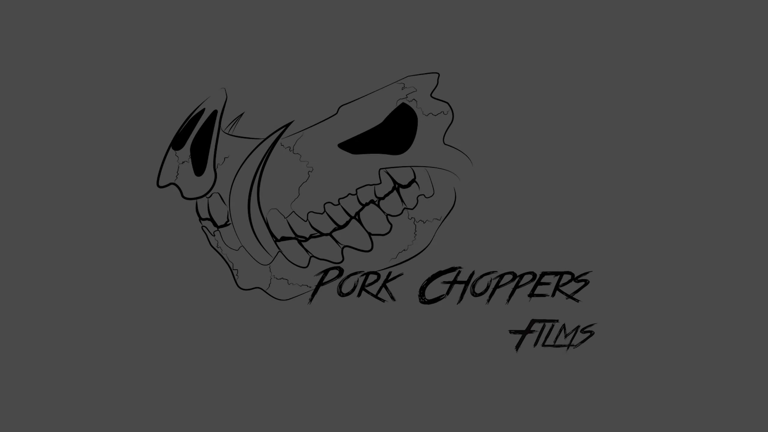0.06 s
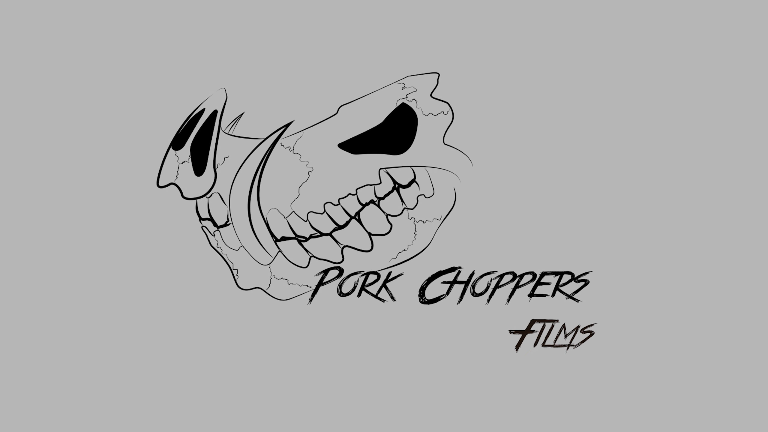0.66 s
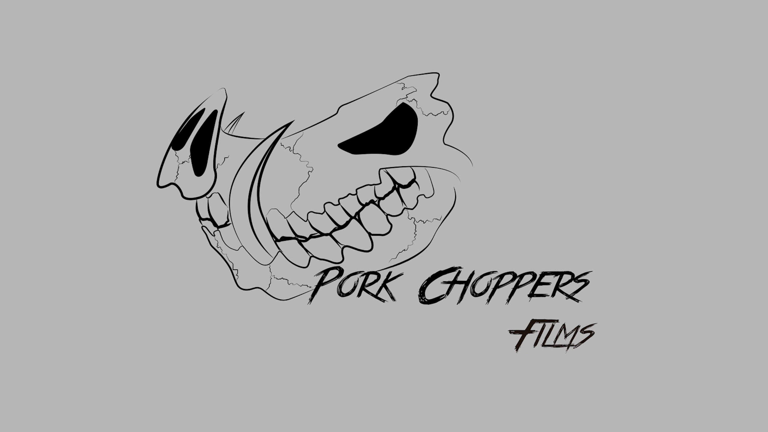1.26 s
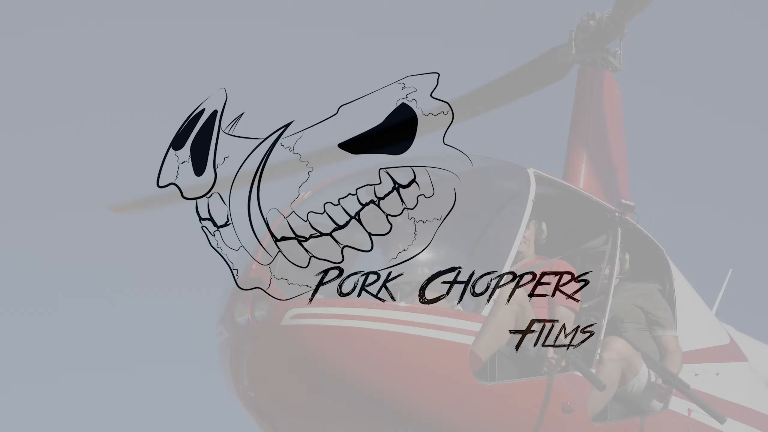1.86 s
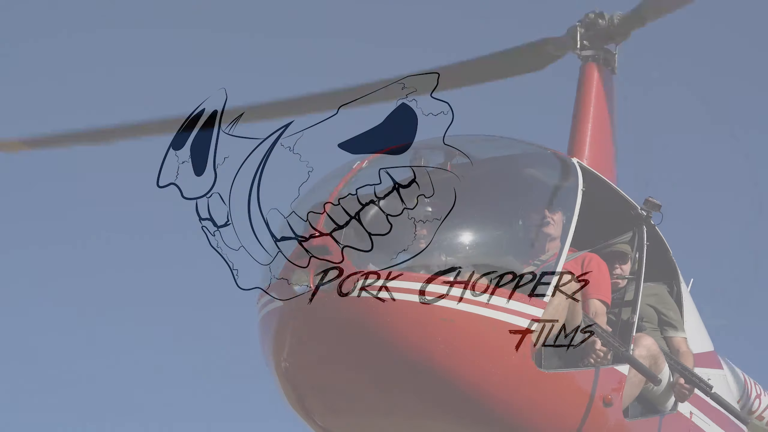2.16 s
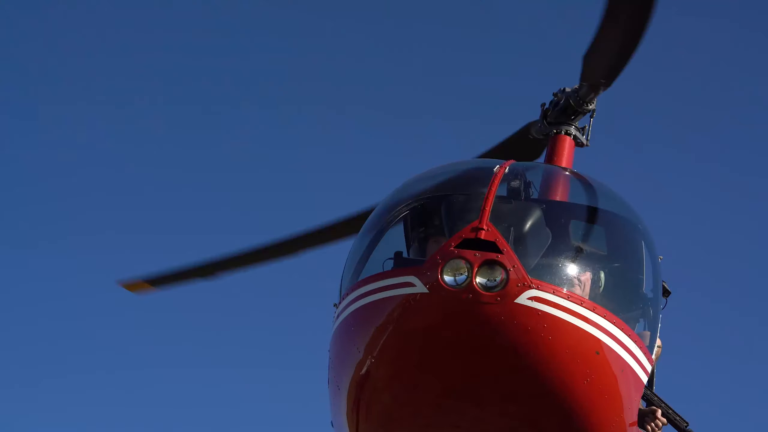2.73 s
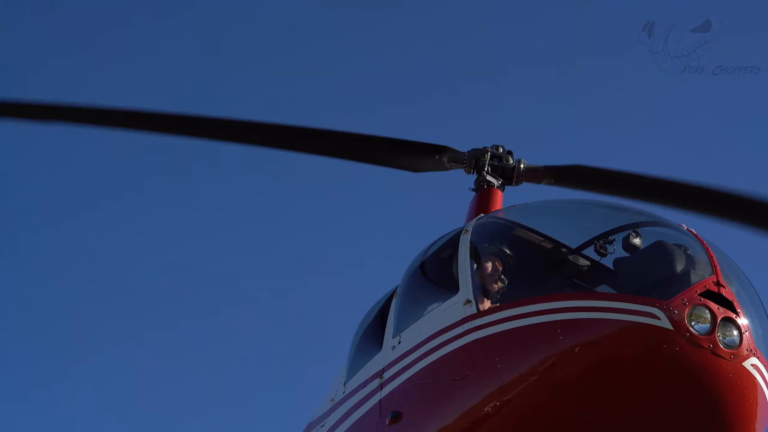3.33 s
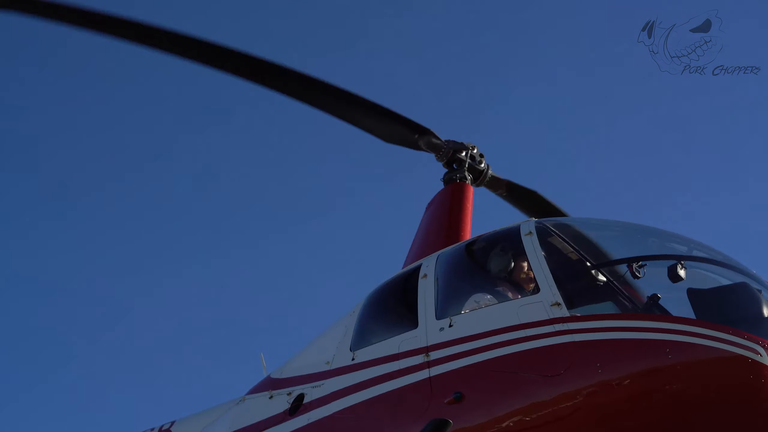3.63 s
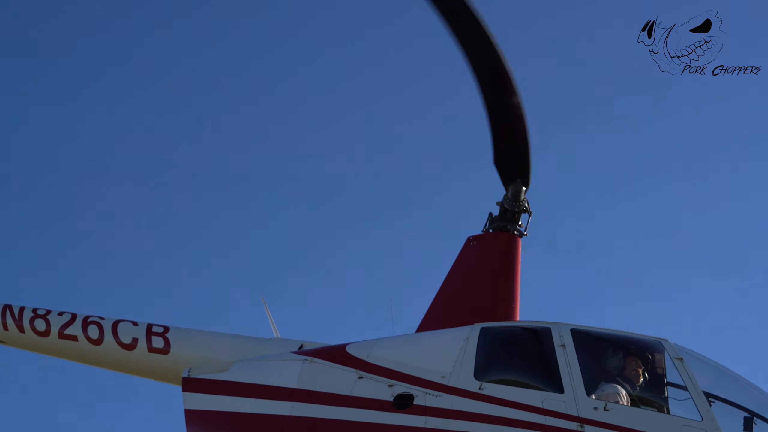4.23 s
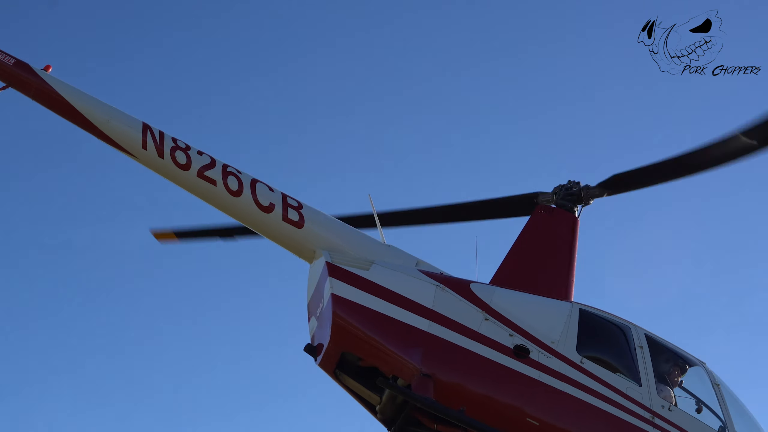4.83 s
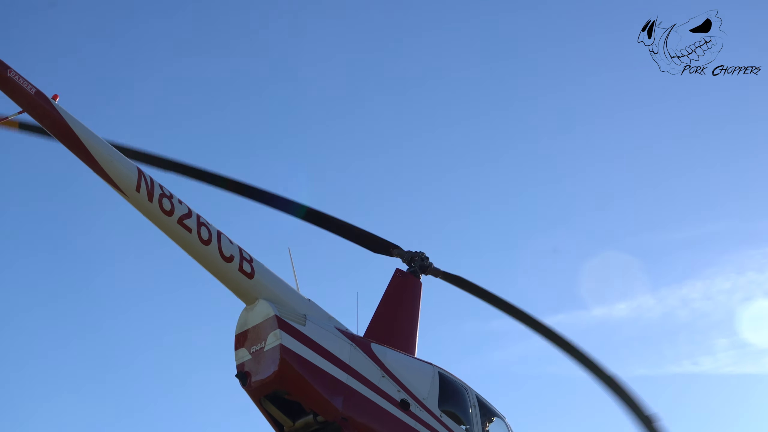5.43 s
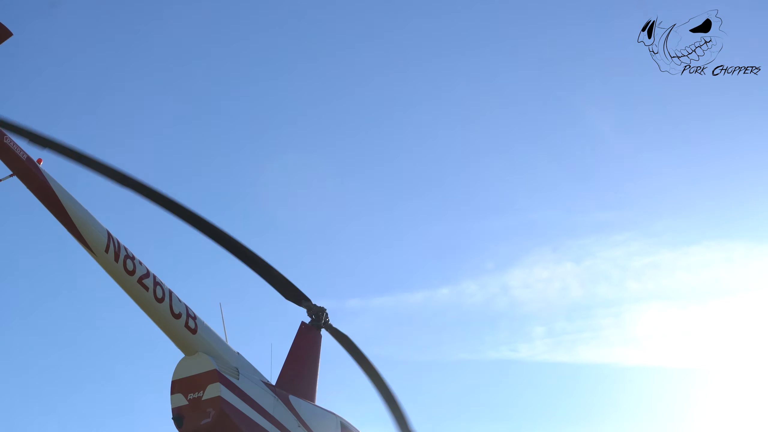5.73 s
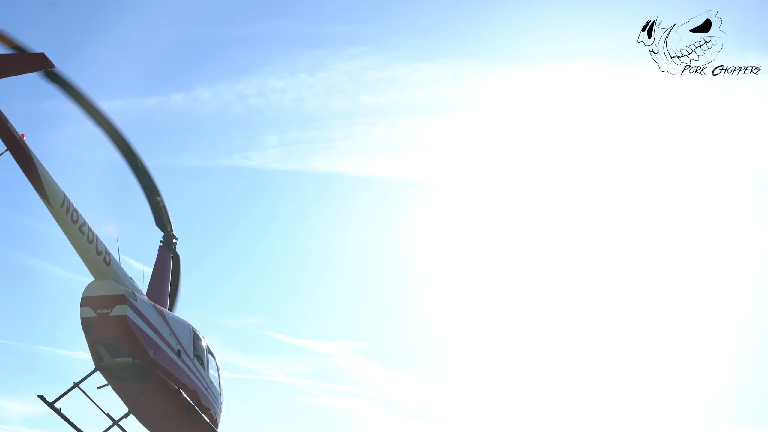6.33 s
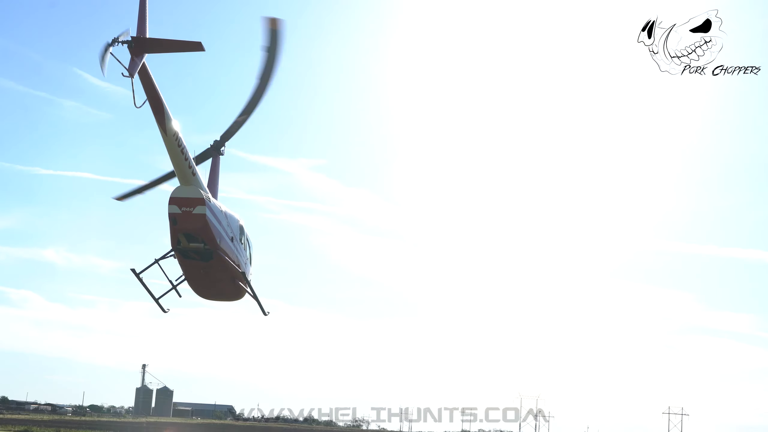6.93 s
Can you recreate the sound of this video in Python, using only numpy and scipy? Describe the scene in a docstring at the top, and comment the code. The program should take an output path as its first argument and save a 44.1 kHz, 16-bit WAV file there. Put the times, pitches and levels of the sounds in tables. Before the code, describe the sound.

After a brief silence, a small helicopter fades in outdoors between about 0.6 and 1.2 seconds. Its rotor blades slap in a fast, even rhythm over an engine hum as it approaches low, strongest from 2 to 4 seconds, with one sharper crack near 4 seconds. By about 4.4 seconds the slaps melt into a pulsing, swishing rush of air as it passes close overhead. A hollow whoosh swells from 5 to 6 seconds, joined by a fluttering exhaust rasp and a brief, bright hiss around 5.7 seconds. From there the air noise eases and the engine and tail rotor settle into a steady, buzzing hum, sinking slightly in pitch as the helicopter moves away, still sounding at the end, around 7 seconds. Downwash rumbles on the microphone throughout, with harder gusts near 1.3, 5 and 6.7 seconds.

```python
"""Blade slaps fade in from silence: a two-bladed piston helicopter approaches low, outdoors,
its blades cutting their own tip vortices. Overhead the slaps melt into a rush of air, combed by
the ground echo. Going away, the exhaust pipe chuffs and rasps, and engine and tail rotor settle
into a hum. Downwash buffets the microphone."""
import sys
import numpy as np
from scipy import signal
from scipy.fft import rfft, irfft, next_fast_len
from scipy.io import wavfile
from scipy.ndimage import map_coordinates

SR = 44100
rng = np.random.default_rng(int(sys.argv[2]) if len(sys.argv) > 2 else 0)


def master(y):
    """Save y as 16-bit WAV."""
    cut = np.clip(np.atleast_2d(y).T, -1, 1)
    pcm = np.round(cut * 32767)  # scale
    wavfile.write(sys.argv[1], SR, pcm.astype(np.int16))


N = 316373
REFERENCE_PASS_S, BLADE_PERIOD_S = 2.307, .07272

# slapping on the approach: start_s, end_s
SLAP_SPAN = (.6, 4.38)
# blade meets wake, relative to its pass: time_s, delay_s
WAKE_DELAY = [(.75, -.0155), (1.5, -0.0063), (1.95, -.003), (2.3, .001), (3.1, .0017), (4.1, .0008)]
# force of the wake hit: time_s, relative_db
SLAP_LEVEL = [(.9, -9), (1.43, -6.5), (1.65, -8), (1.92, -5.5), (2.03, -3), (2.67, -3), (3.1, -8),
              (3.93, -3.5), (4.2, -10.5)]
# vortex crossing rate, the knock's pitch: time_s, rate_hz
CROSSING_RATE = [(1.2, 563), (1.62, 301), (1.82, 543), (2.06, 531), (2.17, 378), (2.73, 368), (2.82, 773),
                 (3.1, 346.4), (3.48, 439), (3.7, 321), (4.3, 338)]
# slap sharpness: time_s, relative_db
CRACK_LEVEL = [(1.0, -21.5), (1.9, -17), (2.45, -26), (3.05, -15), (3.5, -17), (3.8, -27.5)]
# one blade cuts a vortex core: time_s, extra_crack_db
CORE_CUT = (4.053, 13.6)
# successive vortices in one slap: strength_db
VORTEX_STRENGTHS = [3, 0.5, -1.5, -6, -11.5]
# part of a slap torn into turbulence: time_s, power_share
TORN_SHARE = [(1.0, 0.95), (1.4, 0.6), (1.7, 0.8), (2.0, 0.34), (2.5, 0.17), (3.25, 0.83), (3.9, 0.07),
              (4.3, 0.46)]
# slap body, edge and turbulence: freq_hz, density_db
THUD_SPECTRUM = [(80, -41), (220, 0), (340, 4), (620, -3), (800, 0.5), (1400, -9.5), (3000, -30),
                 (12000, -77.5)]
CRACK_SPECTRUM = [(400, -19), (1100, 5.5), (2000, 4), (4200, -10), (6000, -28.5), (16000, -31)]
TORN_SPECTRUM = [(80, -21), (250, 0), (600, -0.5), (1200, -9), (2500, -20), (5000, -28.5), (10000, -32),
                 (16000, -38)]

# low, mid and high blade air noise: freq_hz, density_db
RUSH_SPECTRUM = [(100, -23), (220, 4.5), (330, 0), (520, -1.5), (740, 0.5), (1000, -13), (1500, -29),
                 (3000, -47)]
WHIRR_SPECTRUM = [(550, -10.5), (900, -1), (1200, 4.5), (2000, -3.5), (3200, -6.5), (7000, -32)]
HISS_SPECTRUM = [(1800, -11), (4300, 9), (7000, 7.5), (10500, 2.5), (16000, 3.5)]
# their envelopes: time_s, relative_db
RUSH_LEVEL = [(.8, -40), (1.15, -36), (1.9, -40.5), (2.6, -38), (5.1, -32.5), (5.75, -38.5), (6.25, -41.5),
              (7.17, -44)]
WHIRR_LEVEL = [(1.9, -42), (2.6, -46.5), (3.5, -44.5), (4.38, -37), (5.05, -38.5), (6.65, -45), (7.0, -55)]
HISS_LEVEL = [(1.15, -50.5), (1.9, -43), (2.6, -48.5), (3.5, -46.5), (5.75, -45), (6.25, -49.5),
              (6.72, -48), (7.1, -54)]
# whistle line shape: offset_hz, density_db
WHISTLE_SKIRT = [(500, 2), (1200, -3), (3000, -35)]
# ground reflection: time_s, lag_s, gain
GROUND_ECHO = [(3.6, 0.0031, 0.36), (4.5, 0.0028, 0.16), (5.3, 0.00272, 0.13), (7.17, 0.0023, 0.21)]
# left-right likeness of noise: freq_hz, correlation
STEREO_COHERENCE = [(40, 0.98), (110, 0.83), (250, 0.42), (1000, 0.83), (2500, 0.4), (10000, 0.14)]

# downwash envelope: time_s, relative_db
BUFFET_LEVEL = [(.85, -34.5), (1.12, -30), (1.9, -32.5), (2.5, -34), (4.3, -34), (6.0, -39), (7.17, -35.5)]
# wind on the microphone: freq_hz, density_db
BUFFET_SPECTRUM = [(15, -18), (28, -11), (70, 3.5), (200, -1), (400, -6.5), (700, -32)]
GUST_SPECTRUM = [(25, -20), (130, 4), (300, -7), (800, -14.5), (3000, -49)]
# hard gusts: centre_s, level_db
GUST_EVENTS = [(1.26, -23.5), (1.88, -32), (5.03, -26), (5.55, -28), (5.68, -28), (6.34, -31.5),
               (6.68, -26.5)]

# firing rate of one cylinder bank, sinking on the pass: time_s, rate_hz
BANK_RATE = [(1.2, 68.96), (4.2, 68.23), (5.8, 67.04), (7.17, 66.3)]
# engine tones: time_s, hum_db, overtones_db
ENGINE_LEVELS = [(.8, -34.5, -50), (1.2, -34.5, -38.5), (2.0, -43, -45.5), (4.9, -39, -45),
                 (5.8, -30.5, -37.5), (6.4, -31.5, -34.5), (7.17, -32.5, -31.5)]
# exhaust lines: bank_rate_multiple, relative_db
EXHAUST_LINES = [(1, -14), (3, -2), (4, -3), (5, 2.5), (6, -3), (7, -14), (9, -19.5)]
# tail rotor lines: harmonic, relative_db
TAIL_LINES = [(1, -7), (2, -6), (3, -10.5), (4, -6)]
# six puffs in firing order: strength_db
PUFF_STRENGTHS = [13, 0, 10, 6.5, 5.5, -11]
# exhaust pipe resonances: centre_hz, width_hz, relative_db
PIPE_RESONANCES = [(3100, 430, 3.5), (4200, 410, 2.5), (4800, 210, -7), (5930, 320, -2.5), (7040, 800, 0.5),
                   (8300, 400, -9)]
# exhaust gas noise: freq_hz, density_db
CHUFF_SPECTRUM = [(1200, -24), (2600, -2), (4500, -7.5), (7500, -4), (12000, 0), (16000, -11)]
RASP_SPECTRUM = [(700, -36), (1350, -4.5), (1630, 4.5), (1800, 0), (2100, -5.5), (2500, -8.5), (4000, -32),
                 (9000, -25.5)]
# its envelopes: time_s, level_db
CHUFF_LEVEL = [(5.45, -67.5), (5.6, -41), (5.7, -33), (5.79, -41.5), (6.0, -40), (6.25, -47), (7.17, -52)]
RASP_LEVEL = [(4.6, -63), (5.0, -41), (5.25, -42), (5.55, -49), (6.15, -55), (6.45, -46), (6.68, -40.5),
              (6.9, -45.5), (7.17, -43)]

# hollow swells: centre_s, sigma_s, centre_hz, width_hz, level_db
WHOOSH_EVENTS = [(5.3, .17, 1650, 220, -43), (5.7, 0.28, 1183, 130, -45), (5.8, 0.39, 744, 91, -38.5),
                 (6.416, 0.053, 2610, 600, -44.5)]
# fade-in: time_s, gain
FADE_IN = [(.555, 0), (1.15, 1)]


def amp(db):
    """Decibels to gain."""
    return 10 ** (np.asarray(db) / 20)


def unit(x):
    """Scale to rms 1."""
    return x / np.sqrt(np.mean(x ** 2) + 1e-20)


def bell(offset, sigma):
    """Gaussian of peak 1."""
    return np.exp(-.5 * (offset / sigma) ** 2)


def at_hz(points, hz):
    """Interpolate (freq_hz, value) on a log axis."""
    freqs, values = np.transpose(points)
    return np.interp(np.log(hz + 1), np.log(freqs + 1), values)


def at_s(points, time_s):
    """Interpolate (time_s, value)."""
    return np.interp(time_s, *np.transpose(points))


def curves(rows):
    """Per-sample curve for each column after time_s."""
    time_s, *columns = np.transpose(rows)
    return [np.interp(np.arange(N) / SR, time_s, column) for column in columns]


def wobble(rate_hz):
    """Smooth random curve, rate_hz knots a second."""
    knots = rng.standard_normal(int(N * rate_hz / SR) + 4)
    fine = np.arange(len(knots) * 10) / 10
    return np.interp(np.arange(N) * rate_hz / SR, fine, map_coordinates(knots, [fine]))


def filtered(x, response):
    """Apply a gain given as a function of Hz."""
    size = next_fast_len(N + 8192)
    return irfft(rfft(x, size) * response(np.fft.rfftfreq(size, 1 / SR)), size)[..., :N]


def band(x, centre_hz, width_hz):
    """One resonant band of x, rms 1."""
    return unit(filtered(x, lambda hz: 1 / (1 + (2 * (hz - centre_hz) / width_hz) ** 2)))


def minimum_phase(spectrum, size):
    """Causal frequency response with this spectrum."""
    cepstrum = irfft(np.log(amp(at_hz(spectrum, np.fft.rfftfreq(size, 1 / SR)))))
    cepstrum[1:size // 2] *= 2
    cepstrum[size // 2 + 1:] = 0
    return np.exp(rfft(cepstrum))


def pan(left_over_right_db):
    """Left and right gains."""
    return amp([[left_over_right_db / 2], [-left_over_right_db / 2]])


def noise(spectrum):
    """Stereo noise, mid rms 1, near mono in the bass."""
    def mid_side_gains(hz):
        angle = np.arccos(np.clip(at_hz(STEREO_COHERENCE, hz), -1, 1)) / 2
        return amp(at_hz(spectrum, hz)) * np.array([np.cos(angle), np.sin(angle)])
    mid, side = filtered(rng.standard_normal((2, N)), mid_side_gains)
    return np.array([mid + side, mid - side]) / np.std(mid)


def slap_train():
    """One slap per blade pass: start_s, level_db, crossing_hz, crack_db."""
    first_s, last_s = SLAP_SPAN
    pass_s = np.arange(REFERENCE_PASS_S % BLADE_PERIOD_S, last_s, BLADE_PERIOD_S)
    pass_s = pass_s[pass_s > first_s]
    start_s = pass_s + at_s(WAKE_DELAY, pass_s)
    core_s, core_db = CORE_CUT
    crack_db = at_s(CRACK_LEVEL, pass_s) + core_db * (abs(pass_s - core_s) < BLADE_PERIOD_S / 2)
    return np.transpose([start_s, at_s(SLAP_LEVEL, pass_s), at_s(CROSSING_RATE, pass_s), crack_db])


def blade_slaps(size=4096, jitter=0.041, thud_db=-22, crack_db=-12, torn_db=-24):
    """Each blade cuts several vortices in a row: sharp pressure pulses within torn air."""
    hz, t = np.fft.rfftfreq(size, 1 / SR), np.arange(size) / SR
    thud_filter, crack_filter = minimum_phase(THUD_SPECTRUM, size), minimum_phase(CRACK_SPECTRUM, size)
    pulses, torn_envelope = np.zeros((2, N)), np.zeros(N)
    torn_share = curves(TORN_SHARE)[0]
    train, vortex = slap_train(), np.arange(len(VORTEX_STRENGTHS))
    draws = rng.standard_normal((len(train), 3, len(vortex)))
    for (start_s, level_db, crossing_hz, edge_db), (late, strong, sharp) in zip(train, draws):
        i = round(start_s * SR)
        crossing_s = 0.001025 + (vortex + jitter * late) / crossing_hz
        crossings = np.exp(-2j * np.pi * hz * crossing_s[:, None])
        thud_gains = amp(VORTEX_STRENGTHS + 1.3 * strong)
        crack_gains = amp(VORTEX_STRENGTHS + 4.6 * sharp - 2.4 * vortex)  # first vortices are tightest
        thud = amp(level_db + thud_db) * unit(irfft(thud_filter * (thud_gains @ crossings)))
        crack = amp(level_db + edge_db + crack_db) * unit(irfft(crack_filter * (crack_gains @ crossings)))
        pulses[:, i:i + size] += np.sqrt(1 - torn_share[i]) * (pan(1.4) * thud + pan(4.0) * crack)
        tear = round((start_s - .002) * SR)  # air tears just ahead of the first vortex
        rise_s, decay_s = np.array([0.002, 0.0068]) * (1 + torn_share[i])
        burst = unit((1 - np.exp(-t / rise_s)) * np.exp(-t / decay_s))
        torn_envelope[tear:tear + size] += np.sqrt(torn_share[i]) * amp(level_db + torn_db) * burst
    return pulses + torn_envelope * amp(3.5 * wobble(500)) * noise(TORN_SPECTRUM)


def scatter(x, wet_db=-11, t60_s=0.099):
    """Rough ground and fuselage add a short diffuse tail."""
    t = np.arange(SR // 6) / SR
    tail = rng.standard_normal((2, len(t))) * amp(-60 * t / t60_s)
    return x + amp(wet_db) * signal.fftconvolve(x, tail / np.linalg.norm(tail[0]), axes=1)[:, :N]


def ground_comb(x):
    """The ground echo combs the sound; the teeth climb as its lag shrinks."""
    lag_s, gain = curves(GROUND_ECHO)
    n = np.arange(N)
    echo = np.array([np.interp(n - lag_s * SR, n, channel) for channel in x])
    return (x + gain * echo) / np.sqrt(1 + gain ** 2)


def air_rush():
    """Air off the blades: low rush and mid whirr, combed by the ground."""
    rush = amp(curves(RUSH_LEVEL)[0] + 1.2 * wobble(25)) * noise(RUSH_SPECTRUM)
    whirr = amp(curves(WHIRR_LEVEL)[0] + 2.18 * wobble(140)) * noise(WHIRR_SPECTRUM)
    return ground_comb(rush + whirr)


def blade_offset_s(delay_s):
    """Signed time from the nearest blade pass, delayed by delay_s."""
    half_s = BLADE_PERIOD_S / 2
    return (np.arange(N) / SR - REFERENCE_PASS_S - delay_s + half_s) % BLADE_PERIOD_S - half_s


def blade_hiss(hiss_db=-1, swish_db=6.5, whistle_hz=14700, fall_hz_per_s=85000, blade_gap_db=3):
    """Air swishes with each blade pass; a thin whistle falls after it, louder on one blade."""
    level_db = curves(HISS_LEVEL)[0]
    pulse_depth = curves([(4.2, 0.69), (5.4, 0.79), (5.8, 0)])[0]  # time_s, depth
    swish = pulse_depth * bell(blade_offset_s(0.0079), 0.0089)
    hiss = amp(level_db + hiss_db + swish_db * swish + 0.93 * wobble(150)) * noise(HISS_SPECTRUM)
    offset_s = blade_offset_s(.025)
    sweep = np.cos(2 * np.pi * np.cumsum(whistle_hz - fall_hz_per_s * offset_s) / SR)
    blade = np.floor((np.arange(N) / SR - REFERENCE_PASS_S) / BLADE_PERIOD_S) % 2 - .5
    envelope = amp(level_db + blade_gap_db * blade) * pulse_depth * bell(offset_s, 0.017)
    whistle = envelope * sweep * noise(WHISTLE_SKIRT)
    return pan(-4) * hiss + pan(-8) * whistle


def downwash(buffet_db=-1, gust_sigma_s=0.029):
    """Lumps of air buffet the microphone; hard gusts are brighter."""
    t = np.arange(N) / SR
    buffet = amp(curves(BUFFET_LEVEL)[0] + buffet_db + 3.0 * wobble(30)) * noise(BUFFET_SPECTRUM)
    gusts = sum(amp(db) * bell(t - centre_s, gust_sigma_s) for centre_s, db in GUST_EVENTS)
    return buffet + gusts * noise(GUST_SPECTRUM)


def shaft_tones(cycles, lines, flutter_db, drift_rad):
    """Lines locked to a shaft, wavering in the moving air."""
    tones = np.zeros(N)
    for multiple, db in lines:
        gain = amp(db + flutter_db * wobble(6.4))
        tones += gain * np.sin(2 * np.pi * (multiple * cycles + rng.random()) + drift_rad * wobble(9))
    return unit(tones)


def drivetrain(bank_cycles, tail_ratio=1.178, tail_db=-6, roughness=0.39):
    """Two cylinder banks hum, uneven combustion growls, the geared tail rotor buzzes."""
    hum_db, overtones_db = curves(ENGINE_LEVELS)
    hum = amp(hum_db) * shaft_tones(bank_cycles, [(2, 0)], flutter_db=0.9, drift_rad=0.17)
    growl = shaft_tones(bank_cycles, EXHAUST_LINES, flutter_db=2.44, drift_rad=0.14)
    growl *= unit(1 + roughness * wobble(130))
    buzz = shaft_tones(tail_ratio * bank_cycles, TAIL_LINES, flutter_db=0, drift_rad=0.45)
    overtones = amp(overtones_db) * (growl + amp(tail_db) * buzz)
    return hum + scatter(np.array([overtones, overtones]))


def exhaust_puffs(bank_cycles, ring_db=-4, sigma_firings=0.26, leak=1.0):
    """Each firing puffs gas through the pipe; no two of the six cylinders are alike."""
    firing, phase = np.divmod(2 * bank_cycles, 1)
    strength = amp(PUFF_STRENGTHS)[firing.astype(int) % len(PUFF_STRENGTHS)]
    puffs = unit(leak + strength * bell(phase - .5, sigma_firings))
    gas = noise(CHUFF_SPECTRUM)
    rings = sum(amp(db + ring_db + 4.3 * wobble(14)) * band(gas, centre_hz, width_hz)
                for centre_hz, width_hz, db in PIPE_RESONANCES)
    # the pipe beams its hiss backwards: loud once the tail swings by
    chuff = amp(curves(CHUFF_LEVEL)[0]) * ground_comb(unit(gas + rings))
    rasp = amp(curves(RASP_LEVEL)[0]) * noise(RASP_SPECTRUM)
    return puffs * (chuff + rasp)


def whooshes():
    """Hollow bands of air noise swell and die: three ground-echo peaks, then one brief higher whoosh."""
    t, air = np.arange(N) / SR, noise(WHIRR_SPECTRUM)
    return sum(amp(db) * bell(t - centre_s, sigma_s) * band(air, centre_hz, width_hz)
               for centre_s, sigma_s, centre_hz, width_hz, db in WHOOSH_EVENTS)


def scene():
    """The fly-past, left and right."""
    air = scatter(blade_slaps()) + air_rush() + blade_hiss() + whooshes() + downwash()
    bank_cycles = np.cumsum(curves(BANK_RATE)[0]) / SR
    return air + drivetrain(bank_cycles) + exhaust_puffs(bank_cycles)


def record(dry):
    """Fade-in and steep low-pass."""
    cutoff_hz = 15900
    return filtered(dry * curves(FADE_IN)[0], lambda hz: 1 / (1 + (hz / cutoff_hz) ** 400))


dry = scene()
out = record(dry)
master(out)
```